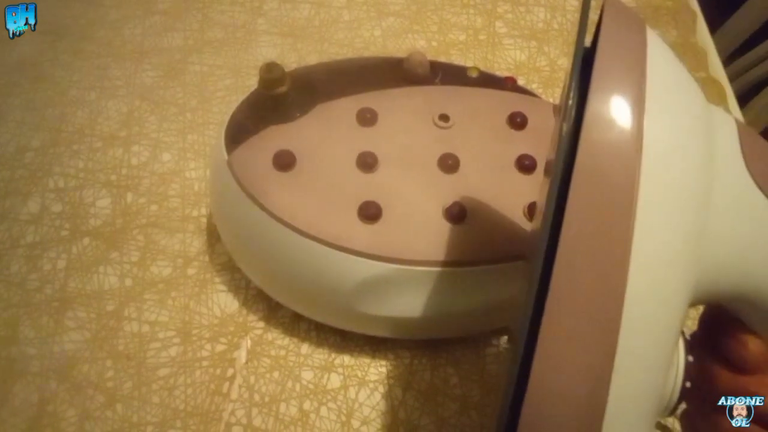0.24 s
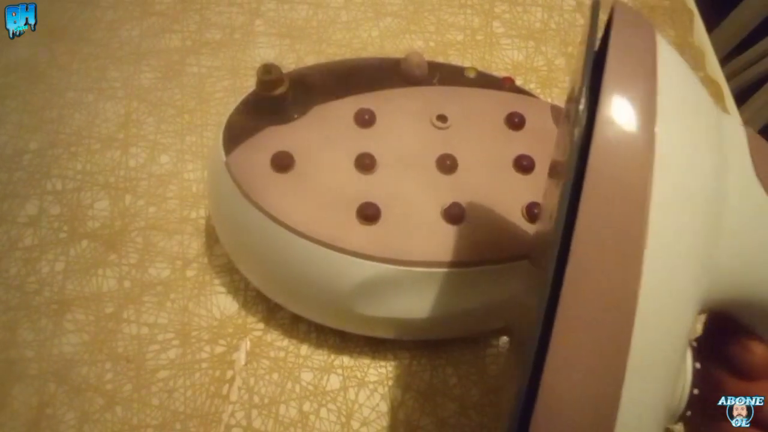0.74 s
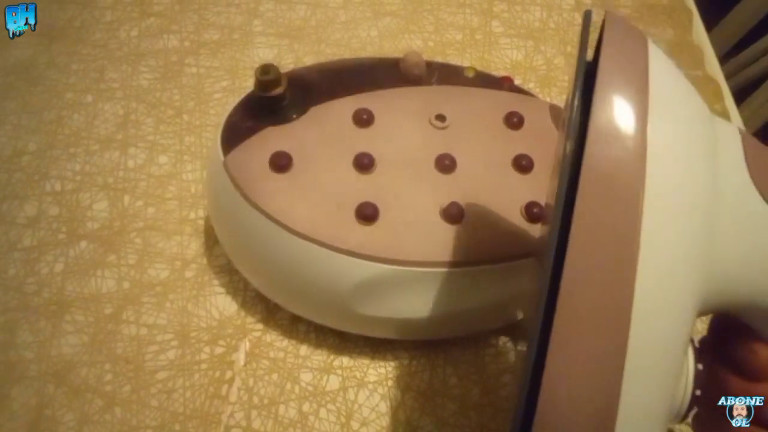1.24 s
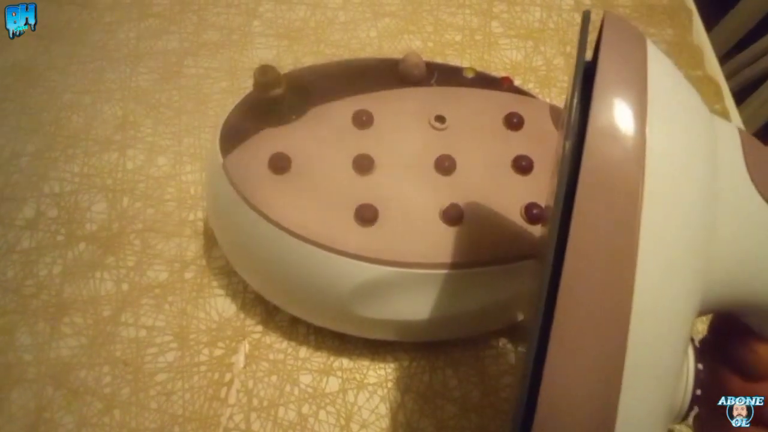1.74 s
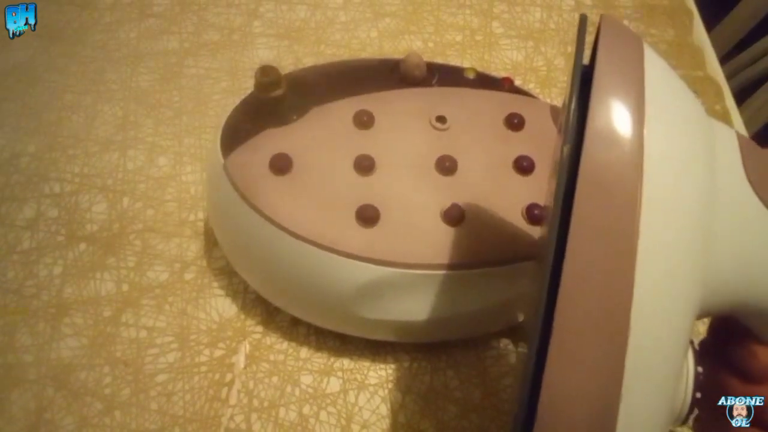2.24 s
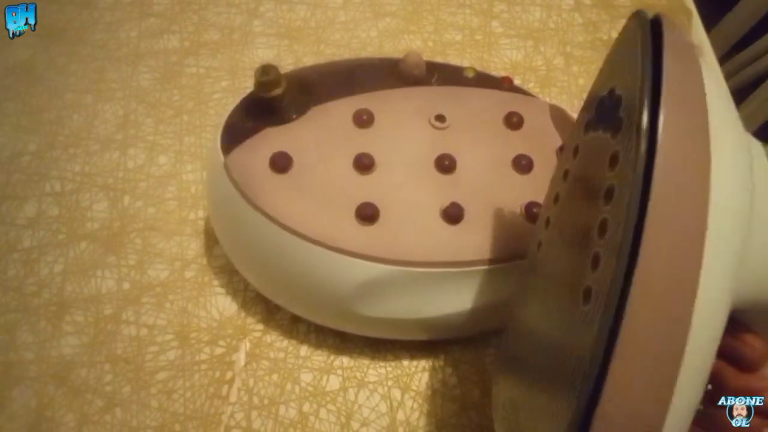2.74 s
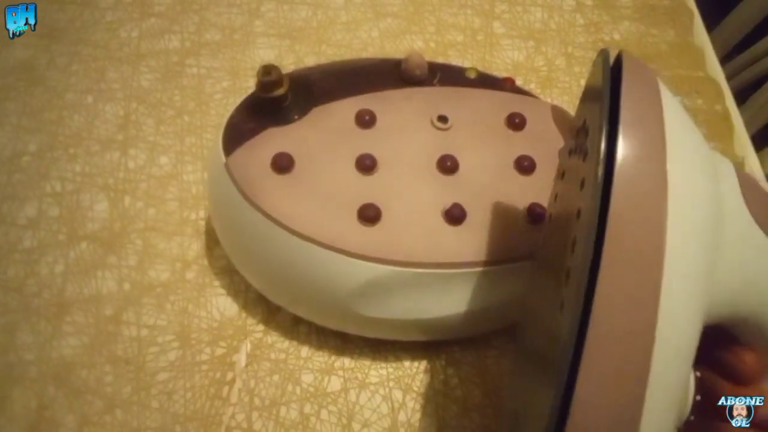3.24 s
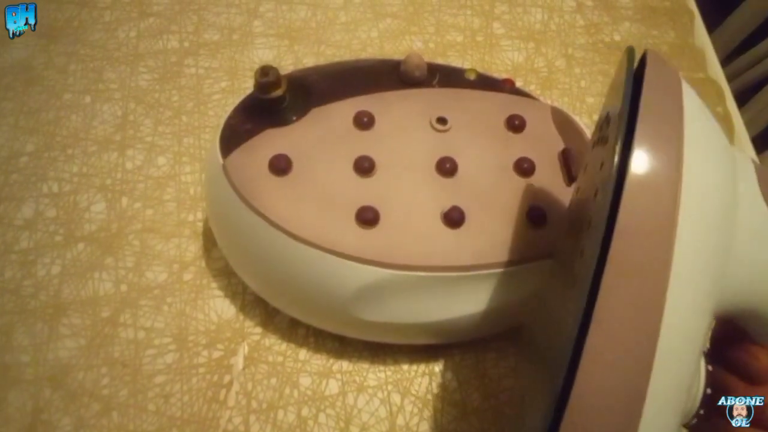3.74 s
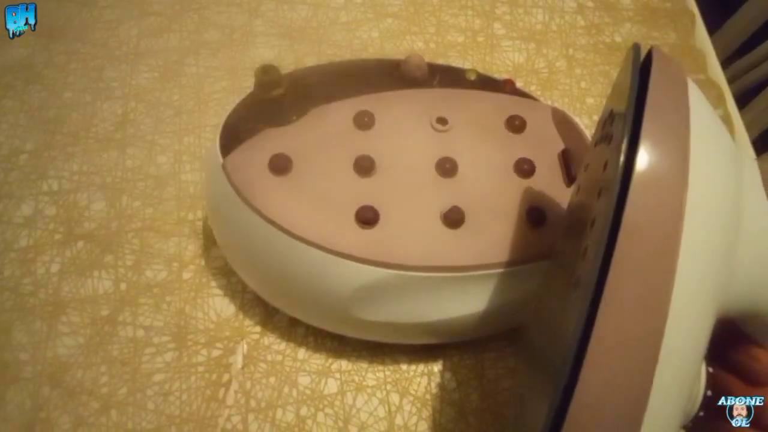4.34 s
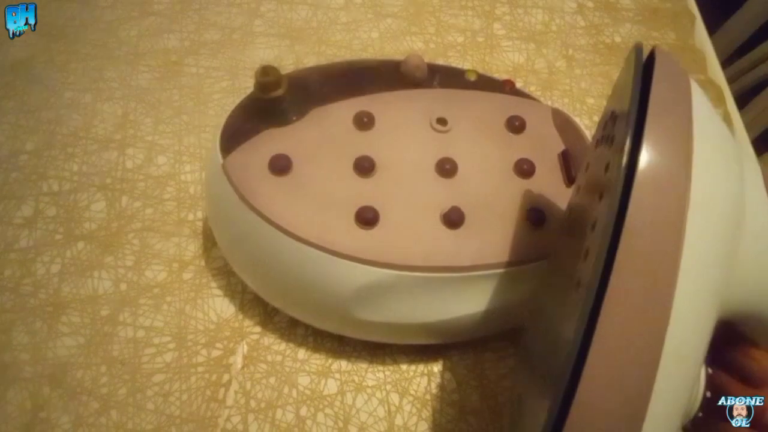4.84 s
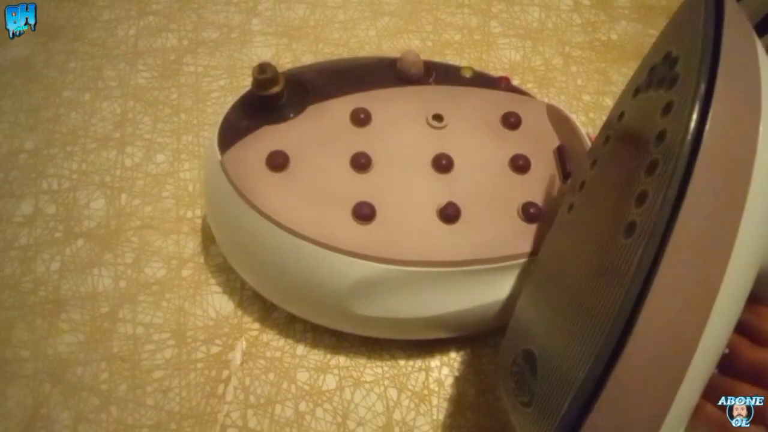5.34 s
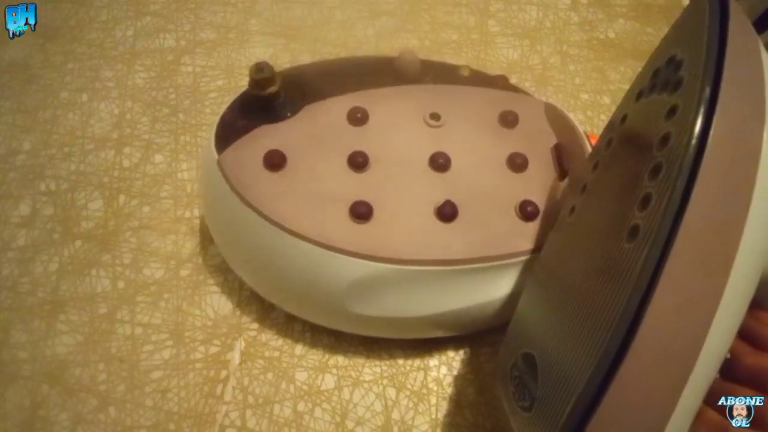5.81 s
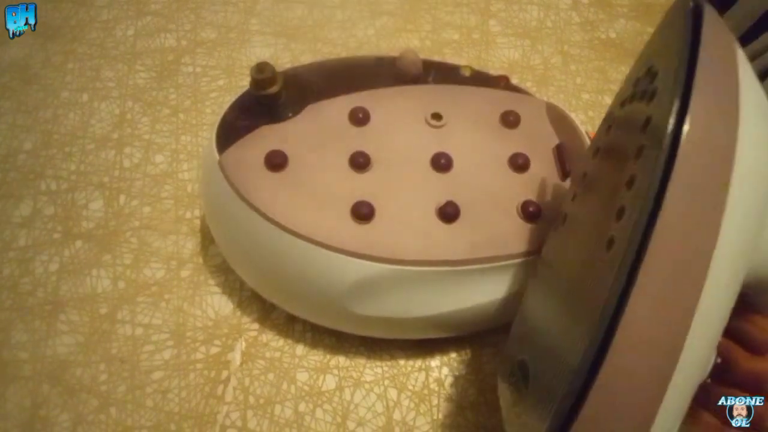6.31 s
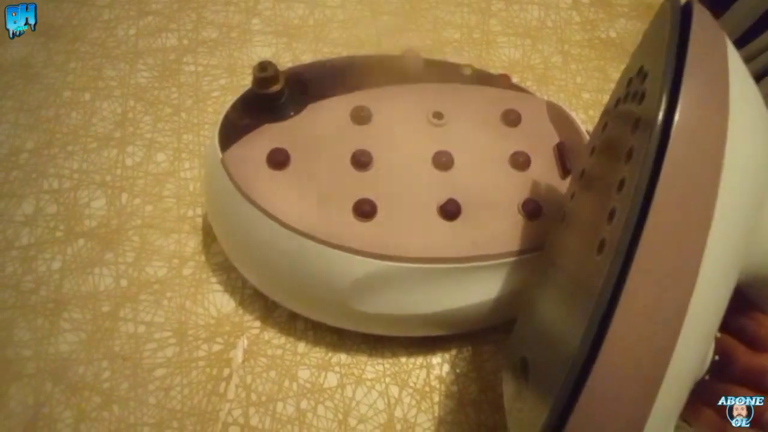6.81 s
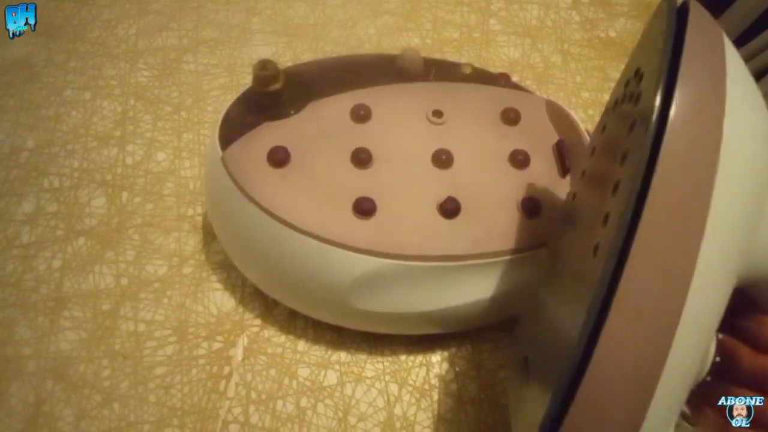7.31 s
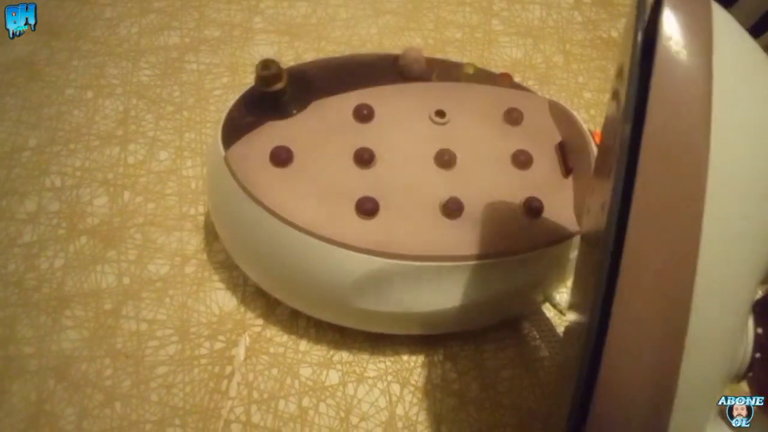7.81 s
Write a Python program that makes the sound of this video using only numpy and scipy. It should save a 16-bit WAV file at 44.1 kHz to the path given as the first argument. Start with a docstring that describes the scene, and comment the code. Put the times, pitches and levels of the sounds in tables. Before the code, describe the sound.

A steam iron is already hissing close to the microphone in a small room, then clicks off. Five more short bursts follow, each opening with a trigger click, a ringing valve clunk and a bright spurt, then hissing steadily until the valve snaps shut. In the gaps, the hollow plastic handle knocks lightly and the boiler simmers faintly.

```python
"""Steam is already hissing from an iron, close to one microphone in a small room: the first of six bursts.
The trigger clicks, the solenoid valve slams open and rings, and steam from a separate boiler jets out of
the soleplate until the valve drops shut. Between bursts the boiler simmers and the hollow plastic
handle knocks in the hand."""
import sys
import numpy as np
from scipy import signal
from scipy.fft import irfft, next_fast_len
from scipy.io import wavfile
from scipy.ndimage import uniform_filter1d

SR = 44100
rng = np.random.default_rng(int(sys.argv[2]) if len(sys.argv) > 2 else 0)


def store_pcm(level_fs):
    """Save levels as 16-bit WAV."""
    pcm = np.round(np.clip(level_fs, -1, 1) * 32767).astype(np.int16)
    wavfile.write(sys.argv[1], SR, np.atleast_2d(pcm).T)


N = 355336

# Bursts of steam; the iron's tilt sets how much of each beamed resonance reaches the microphone:
# opens_s, shuts_s, vent_db, sizzle_db, whistle_db, opening_force_db
STEAM_BURSTS = [(-.5, 0.717, 4, 3.5, 3.5, 0), (1.2915, 2.579, 4, 3, 2.5, 0),
                (4.0442, 4.856, 1, 1, -2, -9.5), (5.5225, 6.289, 5, -.5, 1, 1.5),
                (6.7615, 7.466, 5.5, 1.5, -1, 0.5), (7.8171, 8.4, 5, 0, 0, -.5)]


def gain_of(db):
    """Decibels to amplitude."""
    return 10 ** (np.asarray(db) / 20)


def unit_rms(x):
    """Scales to rms 1."""
    return x / np.sqrt(np.mean(x ** 2) + 1e-20)


def curve_at(points, hz):
    """Reads a table on a log-frequency axis."""
    f, value = np.transpose(points)
    return np.interp(np.log(hz + 1), np.log(f + 1), value)


def resonance_db(rows, hz):
    """The summed lift of bell-shaped resonances."""
    return sum(db * 2 ** -(2 * (hz - f) / width) ** 2 for f, width, db in rows)


def clock(length_s):
    """Sample times from zero."""
    return np.arange(int(length_s * SR)) / SR


def add(mix, start_s, sound):
    """Mixes a sound in, dropping what falls outside."""
    at = round(start_s * SR)
    sound = sound[max(-at, 0):]
    part = mix[max(at, 0):][:len(sound)]
    part += sound[:len(part)]


def noise(colour_db, size):
    """Noise of rms 1 whose spectrum is a function of frequency."""
    full = next_fast_len(size)
    hz = np.fft.rfftfreq(full, 1 / SR)
    spectrum = gain_of(colour_db(hz)) * np.exp(2j * np.pi * rng.random(len(hz)))
    return unit_rms(irfft(spectrum, full)[:size])


def room(x, wet_db, gap_s=0.004):
    """Direct sound plus dense reflections, treble dying first; they differ each time, as the iron moves."""
    # Decay of the small room: frequency_hz, t60_s
    decay = [(120, .44), (500, .43), (2000, .36), (6000, .31), (10000, .22), (15000, .17)]
    hz, t, spectra = signal.stft(rng.choice([-1., 1.], SR * 3 // 4), SR, nperseg=256)
    tail = signal.istft(spectra * gain_of(-60 * t / curve_at(decay, hz)[:, None]), SR, nperseg=256)[1]
    tail *= np.clip(np.arange(len(tail)) / (gap_s * SR) - 1, 0, 1)  # the nearest surface answers first
    tail *= gain_of(wet_db) / np.linalg.norm(tail)
    tail[0] = 1
    return signal.oaconvolve(x, tail)


def boiler(level_db=-65, waver_db=1.6):
    """Fine simmering sings in the tank's resonances and flutters a little, over a steady room tone."""
    # Spectrum of the room tone: frequency_hz, density_db
    room_tone = [(25, 8), (60, 1.5), (130, 1), (400, -6.5), (800, -10.5), (1200, -6), (2200, -17),
                 (3500, -24.5), (6500, -26), (8500, -37.5), (15500, -36.5)]
    # Resonances of the tank: centre_hz, width_hz, lift_db
    tank_modes = [(1130, 130, 16), (1550, 88, -5.5), (1740, 220, 9), (2140, 60, 6.5), (2660, 150, 7.5),
                  (4750, 200, 5), (6290, 230, 3.5)]
    hz, frame_s, spectra = signal.stft(rng.standard_normal(N), SR, nperseg=1024, noverlap=768)
    swell = unit_rms(uniform_filter1d(rng.standard_normal(len(frame_s)), size=4))
    lift_db = resonance_db(tank_modes, hz)[:, None]
    colour_db = curve_at(room_tone, hz)[:, None] + lift_db + waver_db * swell * lift_db / lift_db.max()
    simmer = signal.istft(spectra * gain_of(colour_db), nperseg=1024, noverlap=768)[1][:N]
    return gain_of(level_db) * unit_rms(simmer)


def plastic_tick(t60_s, rise_s=0.00023, top_hz=SR):
    """A snap of hard plastic; a blunt contact loses the treble above top_hz."""
    # The snap as the microphone hears it, with the microphone's own resonance near 15 kHz:
    # frequency_hz, density_db
    snap_at_mic = [(150, -32), (600, -4), (1000, -1), (1600, -5.5), (2150, -15), (3000, -9), (4000, -3),
                   (4900, -6), (6200, -1.5), (7800, -7.5), (9000, -18.5), (11500, -26), (14000, -30),
                   (15500, -14)]
    t = clock(.06)
    snap = noise(lambda hz: curve_at(snap_at_mic, hz) - 10 * np.log10(1 + (hz / top_hz) ** 4), len(t))
    return snap * np.minimum(t / rise_s, 1) * gain_of(-60 * t / t60_s) / 2


def handle(focus_db=7, firm_db=-32.5, firm_t60_s=0.049):
    """Loose plastic parts meet as the grip shifts: a tick, and a hollow knock that is longer when soft."""
    # Knocks in the hand: start_s, level_db, centre_hz, tick_re_knock_db
    knocks = [(0.7555, -27, 920, -1), (0.7631, -26.5, 744, -1), (1.098, -58, 580, -12),
              (1.263, -45.5, 1100, 11), (2.739, -50.5, 515, -21.5), (3.354, -56, 1120, -21),
              (3.5095, -48, 875, -33.5), (3.714, -56.5, 460, -22), (4.972, -42, 453, -27),
              (5.0248, -37, 474, -6), (5.4952, -43.5, 1060, -12), (6.505, -49, 657, -4),
              (6.7278, -44.5, 1065, 7.5), (7.5436, -36.5, 525, -7), (7.641, -33.5, 490, -5),
              (7.694, -51.5, 700, -21)]
    # Resonances of the hollow handle: centre_hz, width_hz, lift_db
    shell_modes = [(452, 230, 11), (610, 140, 8), (870, 120, 11), (1144, 135, 18), (1300, 160, 14),
                   (1780, 200, 14.5), (2590, 300, 2)]
    out, t = np.zeros(N), clock(0.23)
    for start_s, knock_db, centre_hz, tick_db in knocks:
        t60_s = firm_t60_s * 2 ** ((firm_db - knock_db) / 14)  # 14 dB softer scuffs on twice as long
        body = noise(lambda hz: resonance_db(shell_modes, hz)
                     - focus_db * np.log2((hz + 1) / centre_hz) ** 2, len(t))
        add(out, start_s, body * gain_of(knock_db - 60 * t / t60_s) * np.minimum(t / 0.0019, 1))
        add(out, start_s, gain_of(knock_db + tick_db) * plastic_tick(t60_s=0.024, top_hz=10000))
    return room(out, wet_db=-13)[:N]


def trigger(press_lead_s=.0128, release_lead_s=.017, press_db=-18, release_db=-16.5):
    """The switch snaps just before the valve moves, on press and on release."""
    out = np.zeros(N)
    for opens_s, shuts_s, *_ in STEAM_BURSTS:
        for start_s, db in (opens_s - press_lead_s, press_db), (shuts_s - release_lead_s, release_db):
            click = gain_of(db) * plastic_tick(t60_s=0.019, rise_s=0.0019)
            add(out, start_s, room(click, wet_db=-12.5))
    return out


def plunger_slam(mix, lands_s, thump_db, push_s, ring_db, shutting):
    """The plunger sets the valve ringing as it travels, then jolts the housing with one low push."""
    # Modes of the valve and boiler housing: pitch_hz, opening_db, shutting_db, t60_s
    modes = [(132.2, -17, -20.5, 0.38), (180.4, -9, -8.5, 0.22), (252, -24.5, -14.5, 0.17),
             (354, -2, 4, 0.048), (388.4, -25, -1.5, 0.055), (472.5, -7, -3.5, 0.11),
             (945, -21.5, -11, 0.12), (1384, -9.5, -3.5, 0.0696), (1611, -2, -7.5, 0.12),
             (1689, 4.5, 0.5, 0.06), (1765, -1, -5.5, 0.21), (1950, -12, -3, 0.062)]
    travel_s, swell_s = .0048, .003
    t = clock(.4)
    push = (t - travel_s) / push_s
    slam = gain_of(thump_db) * (push ** 2 - 1) * np.exp(-push ** 2 / 2)
    for hz, opening_db, shutting_db, t60_s in modes:
        # the high modes belong to the valve; the low ones to the housing, which rings on after the push
        drive_db, age_s = (ring_db, t) if hz > 800 else (thump_db - 8.5, np.maximum(t - travel_s, 0))
        swing = np.sin(2 * np.pi * (hz * t + rng.random())) * np.minimum(age_s / swell_s, 1)
        slam += gain_of(drive_db + (shutting_db if shutting else opening_db) - 60 * age_s / t60_s) * swing
    add(mix, lands_s - travel_s, room(slam, wet_db=-11.5))


def valve(seat_lead_s=0.003495):
    """The coil pulls the valve open hard; a spring seats it more softly, just before the flow dies."""
    out = np.zeros(N)
    for opens_s, shuts_s, *_, force_db in STEAM_BURSTS:
        plunger_slam(out, opens_s, thump_db=-14.5 + 0.11 * force_db, push_s=0.00082,
                     ring_db=-24.5 + force_db, shutting=False)
        plunger_slam(out, shuts_s - seat_lead_s, thump_db=-27, push_s=0.00071,
                     ring_db=-30.5, shutting=True)
    return out


def soleplate_hiss(open_s, vent_db, sizzle_db, whistle_db):
    """Jet noise in the soleplate; its resonances climb as steam, carrying sound faster, drives out air."""
    # The hiss as the microphone hears it, with the microphone's own resonance near 15 kHz:
    # frequency_hz, density_db
    hiss_at_mic = [(30, -31), (80, -21), (170, -10.5), (350, -1.5), (1000, -1), (2500, 1.5), (3600, -0.5),
                   (4500, -9), (6600, -9.5), (8300, -20.5), (9400, -23), (12500, -38), (13800, -36),
                   (14900, -26.5)]
    # Resonances of the soleplate and its steam channels: centre_hz, width_hz, lift_db
    plate_modes = [(186, 35, 3.5), (360, 50, 3), (425, 35, -4.5), (502, 30, 2.5), (540, 30, -3),
                   (617, 70, 5.5), (720, 110, 2.5), (935, 45, 3.5), (1720, 200, 1.5), (2020, 160, -2.5),
                   (6327, 60, 3.5), (6560, 260, 3), (6950, 300, -2.5), (7430, 110, 3.5), (8790, 120, 2.5)]
    # Lesser resonances of the vent holes: centre_hz, width_hz, lift_db
    vent_modes = [(2600, 160, 1), (2840, 150, -1), (3440, 150, -2), (3567, 180, 2)]
    # Resonances that the vent holes beam outward: centre_hz, width_hz, lift_db
    beamed_modes = [(3076, 400, vent_db), (5220, 1600, sizzle_db), (5220, 180, whistle_db)]
    rise_s, purge_s, bleed_s, flutter_db = 0.0019, 0.028, .016, 0.1
    t = clock(open_s + 0.13)
    hz, frame_s, spectra = signal.stft(rng.standard_normal(len(t)), SR, nperseg=1024, noverlap=768)
    hz = hz[:, None] / (1 - 0.4 * np.exp(-frame_s / purge_s))  # the whole spectrum starts 40% low
    colour_db = curve_at(hiss_at_mic, hz)
    for modes in plate_modes, vent_modes, beamed_modes:
        colour_db += resonance_db(modes, hz)
    colour_db += flutter_db * unit_rms(uniform_filter1d(rng.standard_normal(len(frame_s)), size=5))
    hiss = unit_rms(signal.istft(spectra * gain_of(colour_db), nperseg=1024, noverlap=768)[1][:len(t)])
    bleed = np.exp(-np.maximum(t - open_s, 0) / bleed_s)  # pressure bleeds away once the valve shuts
    return hiss * (1 - np.exp(-t / rise_s)) * bleed


def steam(hiss_db=-35, spurt_db=-27, spurt_t60_s=0.087):
    """Each burst opens with a bright spurt at full boiler pressure, then settles to a steady hiss."""
    # The spurt as the microphone hears it, with the microphone's own resonance near 15 kHz:
    # frequency_hz, density_db
    spurt_at_mic = [(300, -27.5), (1300, 3), (3500, -18), (4700, -9), (6600, 3.5), (8200, -7.5),
                    (8900, -10.5), (9500, 4.5), (10500, -7), (11100, -17), (13100, -13), (14300, 2),
                    (15300, 4), (15900, 4.5)]
    out, t = np.zeros(N), clock(0.3)
    for opens_s, shuts_s, vent_db, sizzle_db, whistle_db, force_db in STEAM_BURSTS:
        hiss = gain_of(hiss_db) * soleplate_hiss(shuts_s - opens_s, vent_db, sizzle_db, whistle_db)
        add(out, opens_s - .003, room(hiss, wet_db=-10.5))
        spurt = noise(lambda hz: curve_at(spurt_at_mic, hz), len(t)) * np.minimum(t / 0.0015, 1)
        spurt *= gain_of(spurt_db + force_db - 60 * t / spurt_t60_s)
        add(out, opens_s - .005, room(spurt, wet_db=-3.5))
    return out


def scene():
    """One microphone close to the iron feeds both channels."""
    return np.tile(steam() + valve() + trigger() + handle() + boiler(), (2, 1))


def record(dry):
    """The microphone's bass roll-off and the recorder's band limit."""
    low_cut_hz, band_limit_hz = 80, 15800
    thinned = signal.sosfilt(signal.butter(2, low_cut_hz, "highpass", fs=SR, output="sos"), dry)
    band_limit = signal.firwin(511, band_limit_hz, window=("kaiser", 9), fs=SR)
    return signal.oaconvolve(thinned, band_limit[None], "same")


dry = scene()
out = record(dry)
store_pcm(out)
```